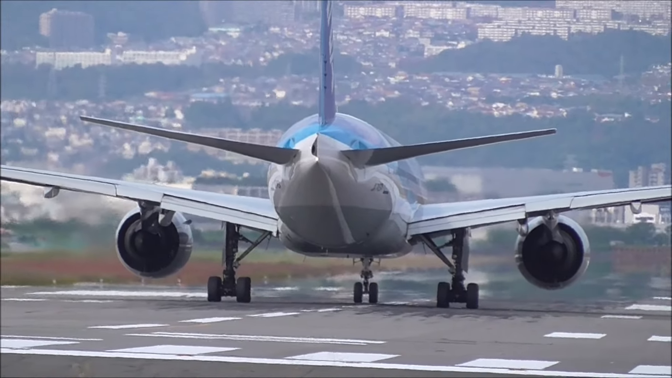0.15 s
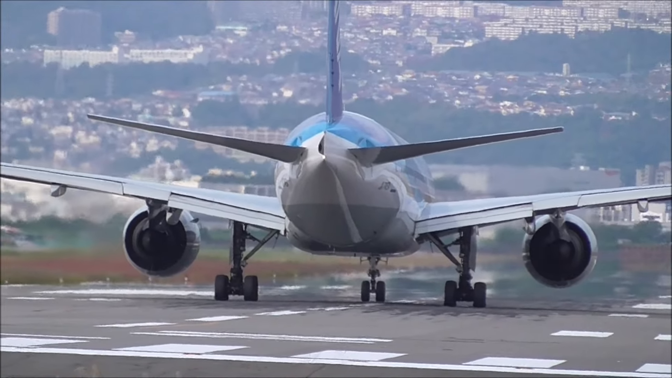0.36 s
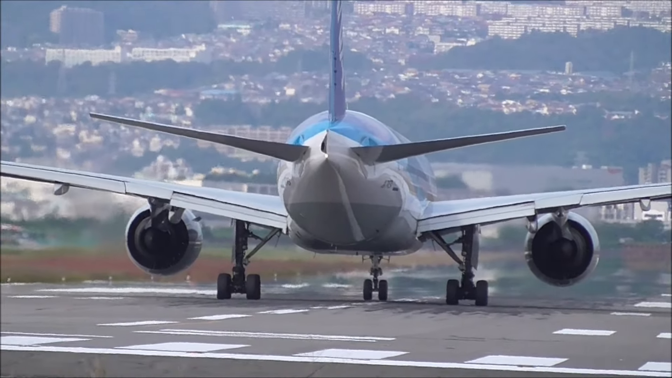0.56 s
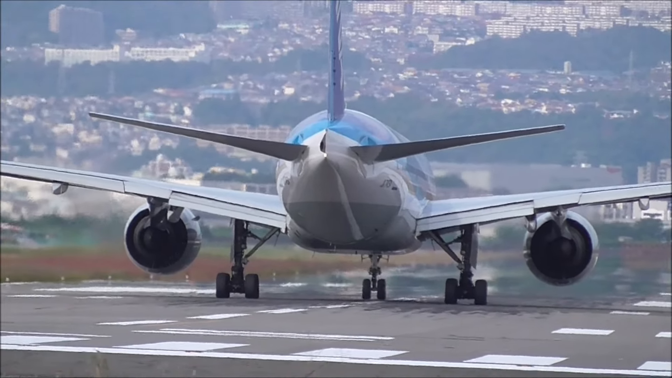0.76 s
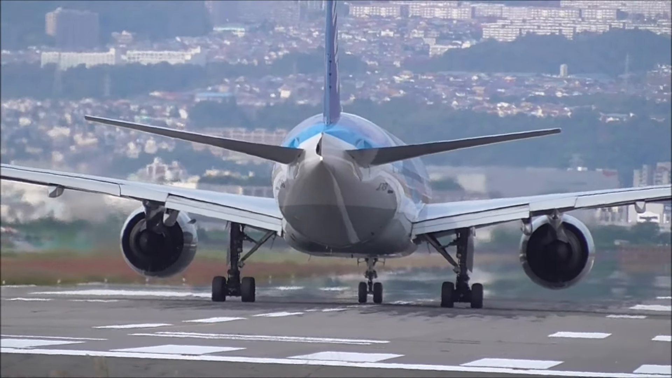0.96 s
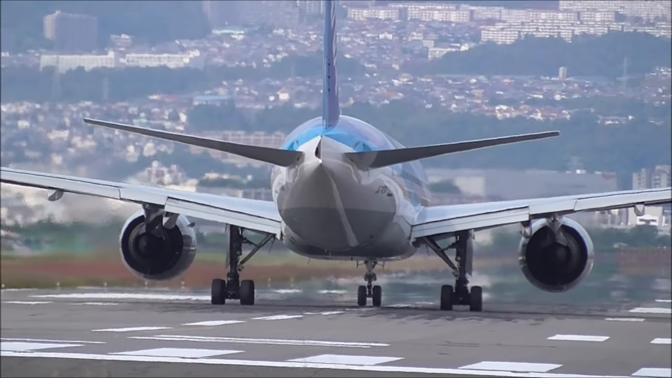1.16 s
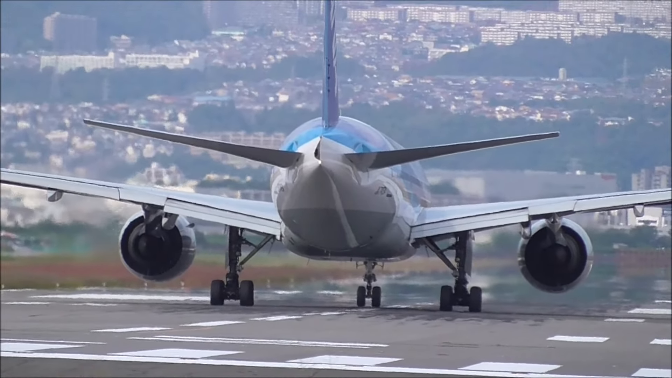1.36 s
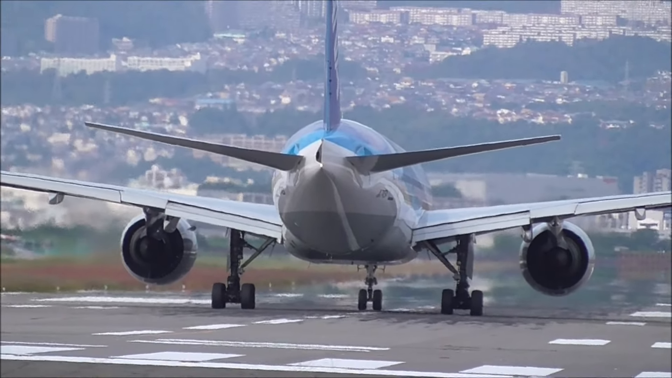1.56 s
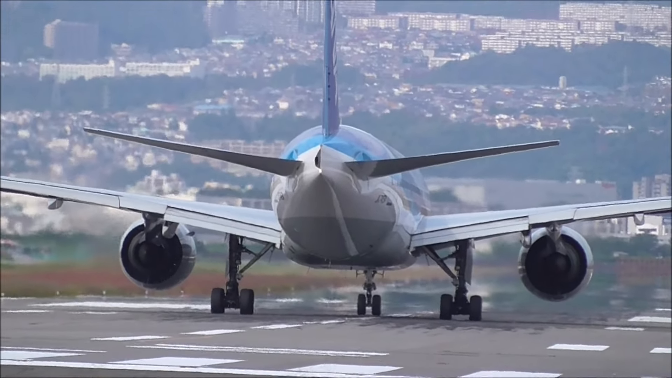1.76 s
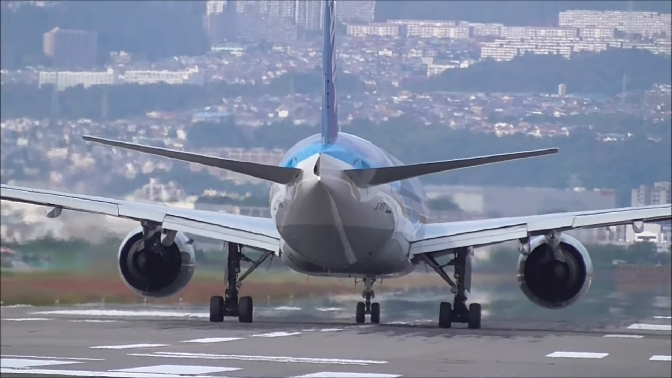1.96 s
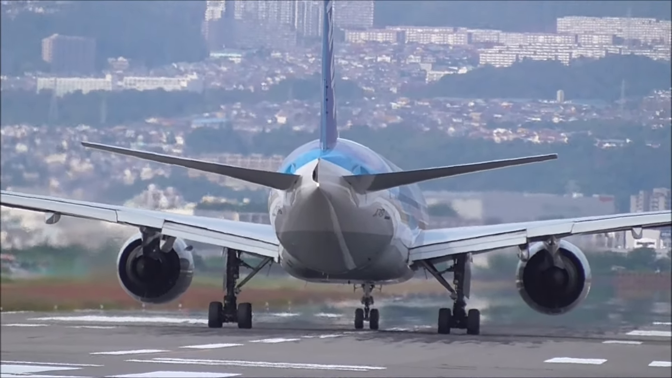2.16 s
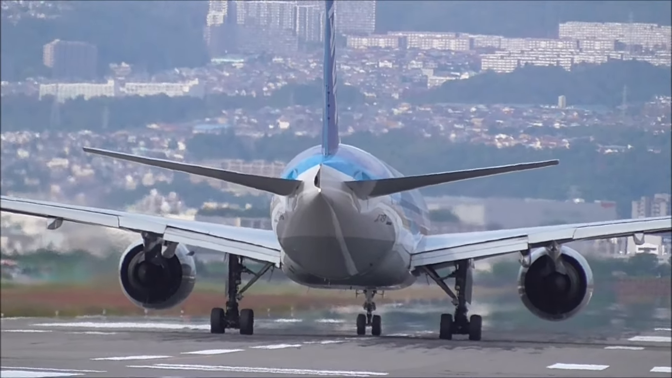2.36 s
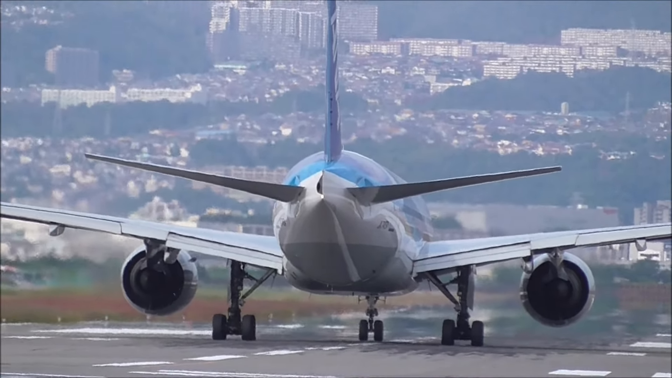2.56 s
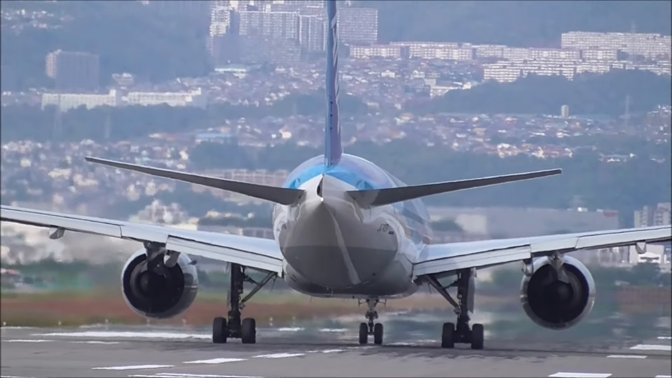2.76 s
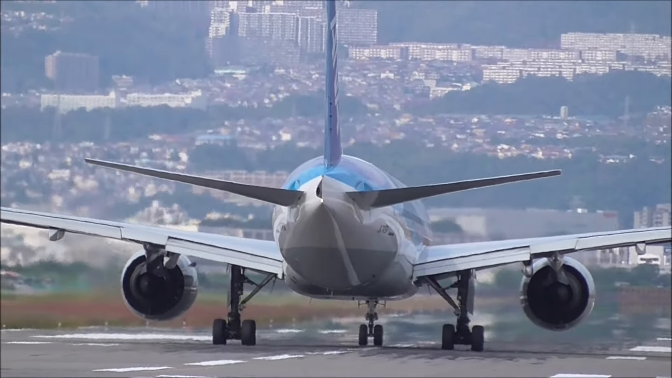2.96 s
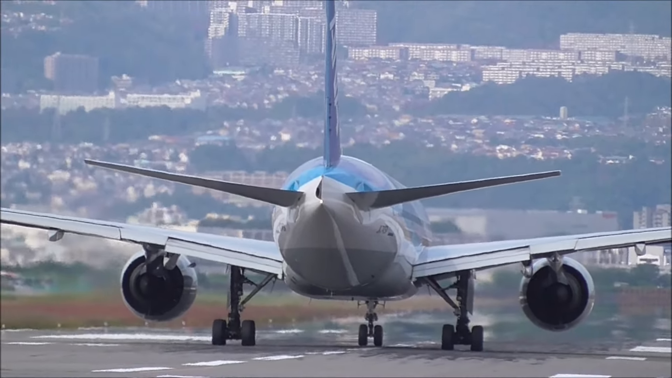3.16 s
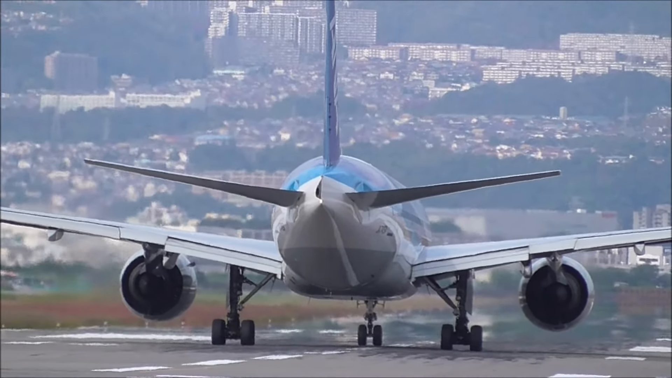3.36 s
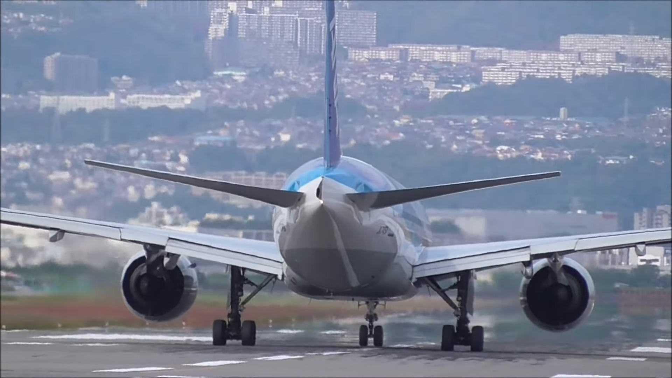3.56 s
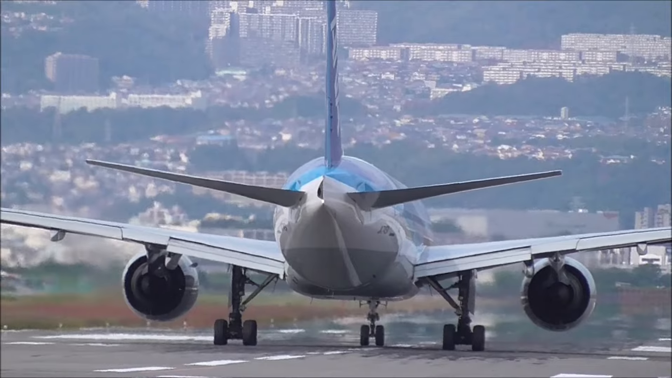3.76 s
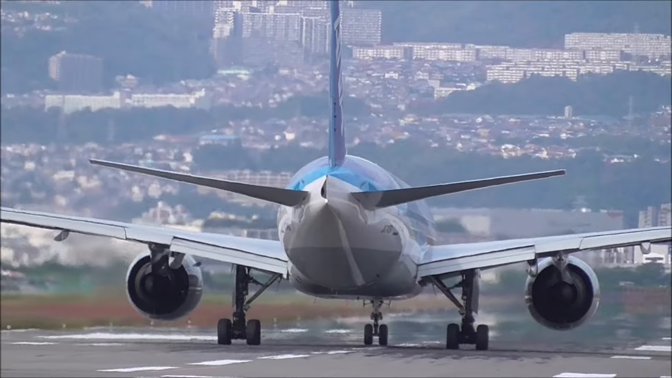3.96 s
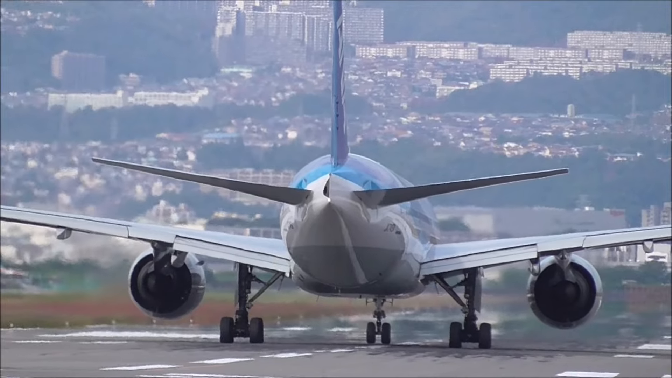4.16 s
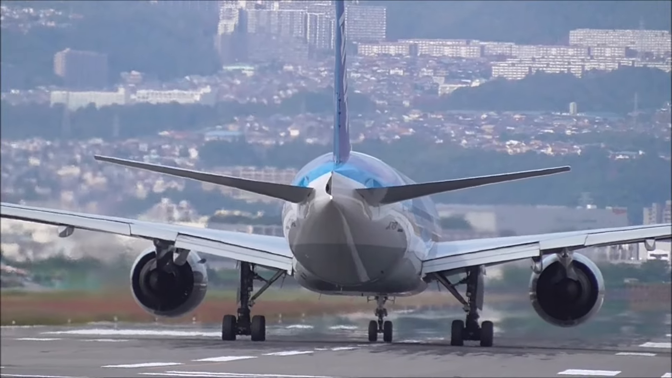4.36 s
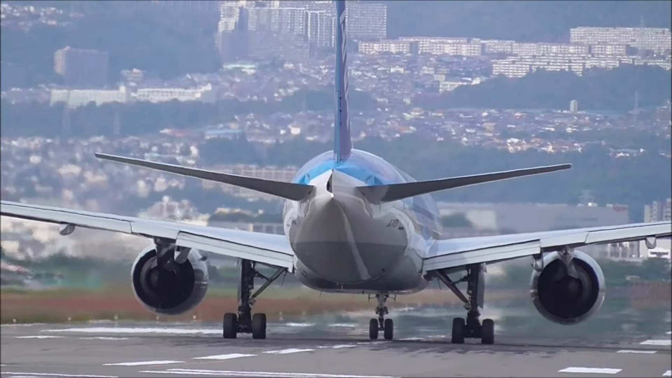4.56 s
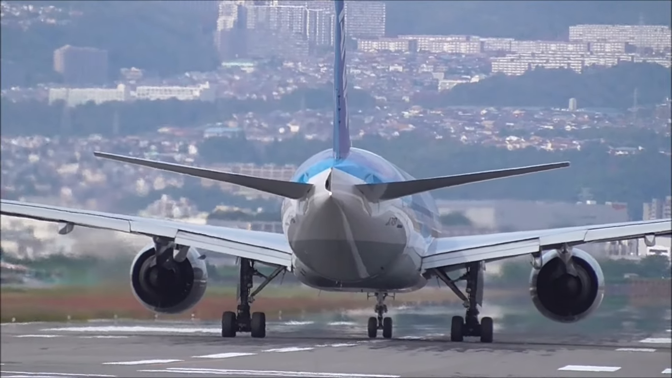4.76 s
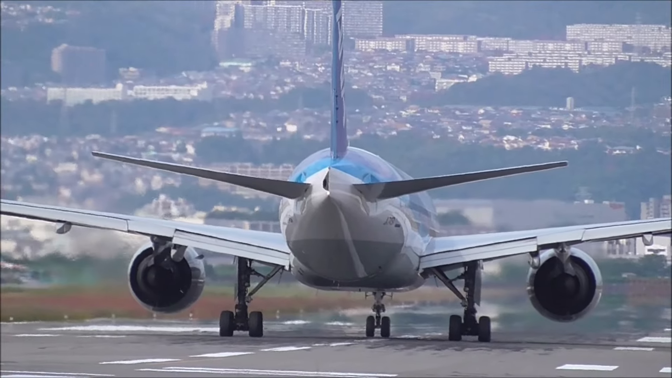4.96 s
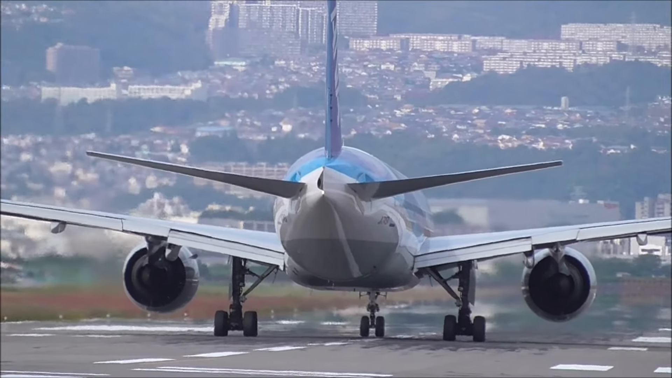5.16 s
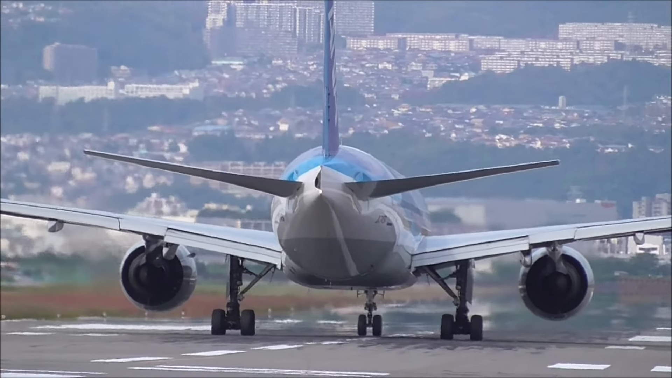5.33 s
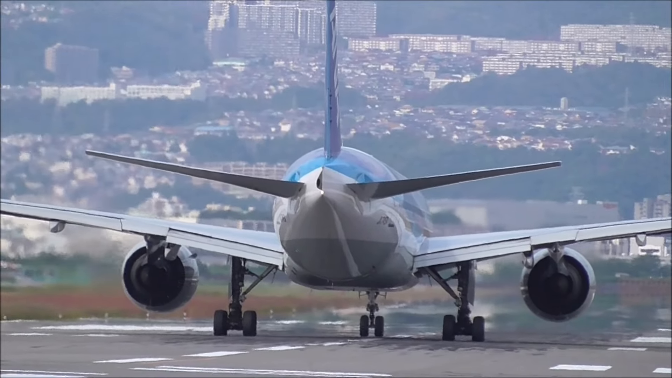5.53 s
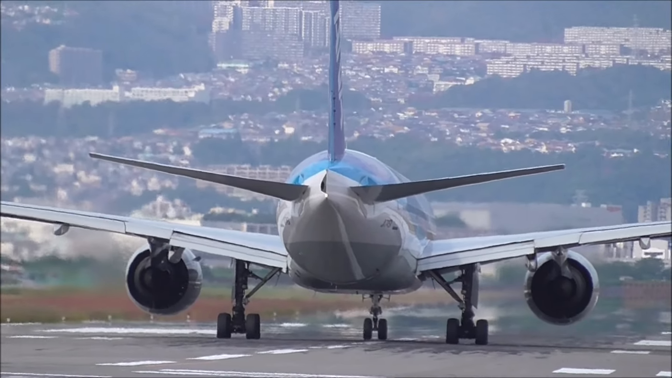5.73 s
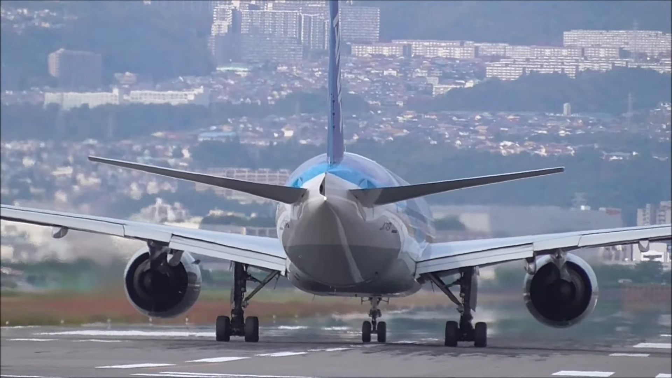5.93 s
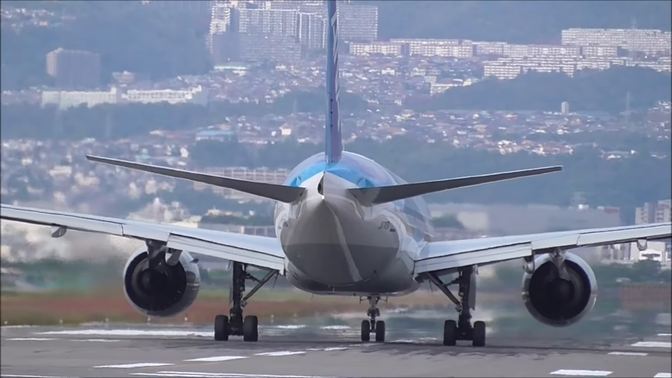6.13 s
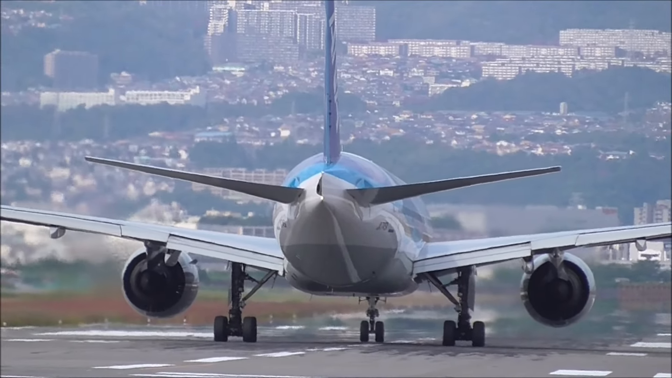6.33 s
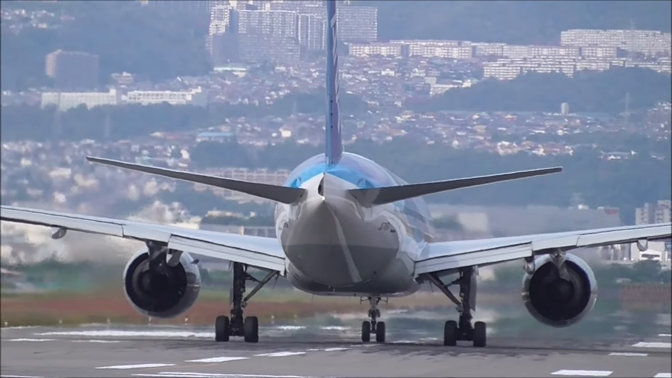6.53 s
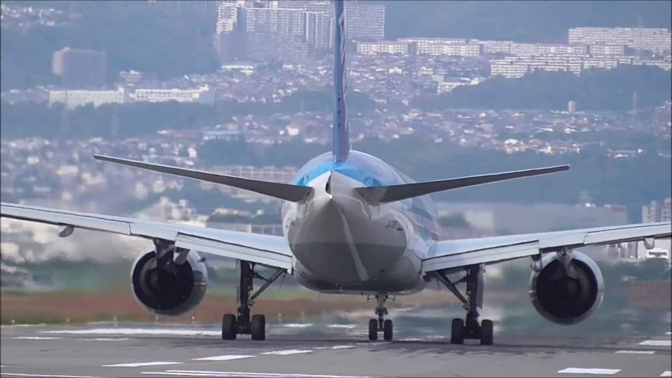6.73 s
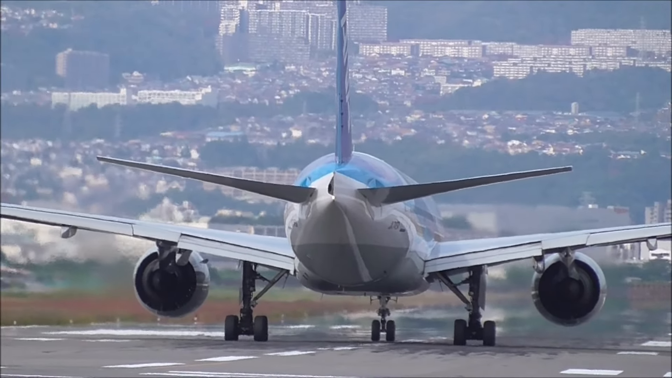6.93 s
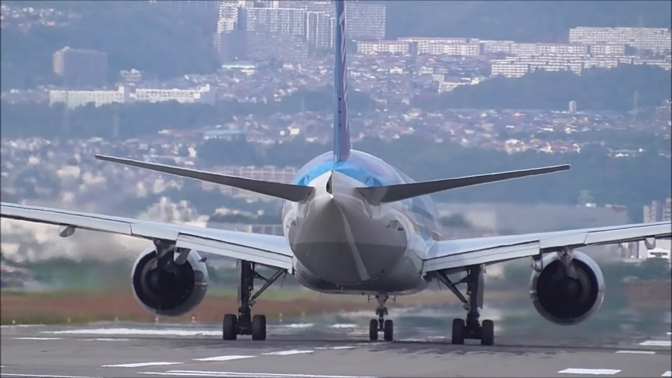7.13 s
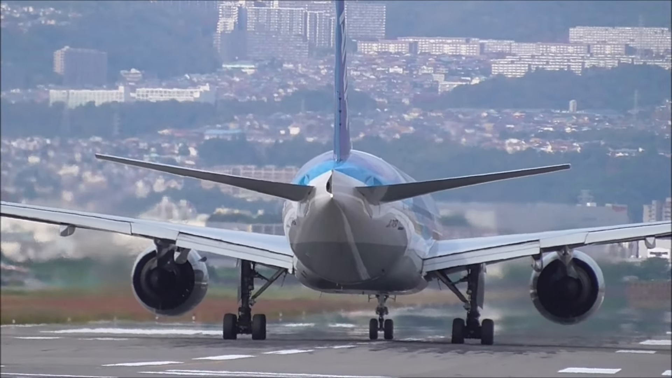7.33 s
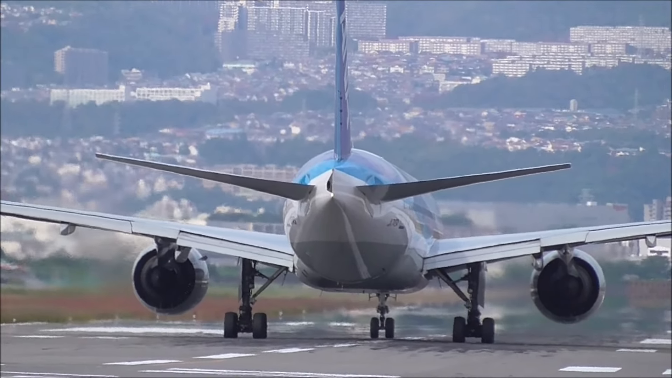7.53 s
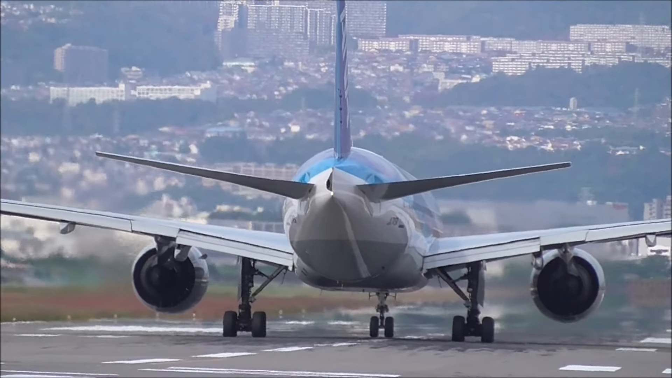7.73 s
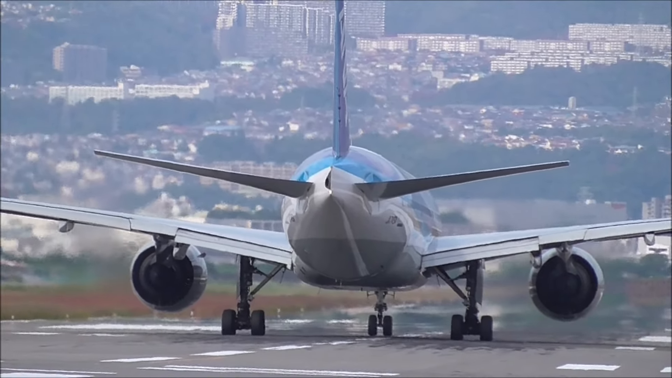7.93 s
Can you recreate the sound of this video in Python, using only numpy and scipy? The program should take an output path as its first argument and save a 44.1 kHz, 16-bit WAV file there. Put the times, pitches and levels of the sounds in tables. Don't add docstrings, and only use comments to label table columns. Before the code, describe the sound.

A jet airliner far down the runway holds a soft, windy exhaust roar over deep airfield bass, with two close low tones swelling and fading. Left-sided gusts flutter and thump at the small camera microphone, strongest after the middle, with faint body ticks. Then the throttles rise: the rumble and midrange roar grow, and hollow howls flare unevenly, one engine's tone dropping to a lower pitch, still loud at the end.

```python
import sys
import numpy as np
from scipy import signal
from scipy.fft import rfft, irfft, next_fast_len
from scipy.io import wavfile
from scipy.ndimage import uniform_filter1d, map_coordinates

SR = 44100
rng = np.random.default_rng(int(sys.argv[2]) if len(sys.argv) > 2 else 0)


def invert_db(x):
    u = np.asarray(x, float) / 20
    return 10 ** u


def store_wav(level_fs):
    pcm = np.round(np.clip(np.atleast_2d(level_fs), -1, 1) * 32767)
    wavfile.write(sys.argv[1], SR, pcm.T.astype(np.int16))


N = 352359

# [f/Hz, density/dB]
PREAMP_SPECTRUM = [(2000, -30), (5000, -12.5), (5700, -21.5), (6800, -12), (7200, -6.5), (8300, -1),
                   (9400, 3.5), (10300, 4.5), (11000, -2), (12400, 0), (13000, 3), (14200, -20.5),
                   (15500, -15.5)]
# [t/s, level/dB peak, bright snap level/dB]
CAMERA_TICKS = [
    (4.8654, -45, -10),
    (4.8678, -49, -8),
    (5.855, -46, -17),
    (5.859, -46, -16),
    (5.8757, -32.5, -25),
    (5.8805, -44, -16),
    (5.887, -55, -8),
]
# [f/Hz, density/dB]
FIELD_SPECTRUM = [(15, -45), (25, -13), (40, -8), (60, 1), (110, 1), (160, 1.5), (300, -42)]
# [t/s, held/s, level/dB, extra brightness/dB]
LEFT_GUSTS = [(.1, .02, -51, -29), (.42, 0.11, -38.5, 0.5), (.92, .1, -44, 1), (1.3, 0.15, -44, -13),
              (1.601, 0.024, -42.5, -7), (1.8, 0.094, -46, -1), (2.1, 0.25, -44.5, -12),
              (2.95, .05, -59, -6), (3.5, 0.14, -37.5, -6), (3.8, .1, -45.5, -5), (4.0, 0.26, -36.5, -9),
              (4.42, 0.2, -40, -3), (4.72, .1, -37.5, -8), (5.09, .05, -40, -12), (5.26, .08, -36, 5.5),
              (5.48, 0.31, -35, 0), (5.95, .15, -48, 1), (6.5, .02, -42, -5), (6.8, 0.036, -40.5, 8),
              (7.0, 0.15, -37, 4), (7.27, .35, -38.5, 6), (7.801, 0.017, -48, -3.5)]
# [t/s, held/s, level/dB]
RIGHT_GUSTS = [
    (.5, .02, -49),
    (1.7, .1, -44),
    (2.25, .1, -64.5),
    (4.2, 0.056, -40.5),
    (5, 0.98, -53),
    (6.7, .4, -54),
    (7.5, .1, -41.5),
]
# [f/Hz, density/dB]
BUFFET_SPECTRUM = [(15, -53), (25, -28.5), (60, -7), (113, 2.5), (200, -2), (300, -17.5), (500, -28),
                   (1200, -70)]
# [f/Hz, density/dB]
FLAP_SPECTRUM = [(100, -31), (220, -0.5), (320, -3), (480, -13), (700, -29), (1200, -36.5), (2600, -97)]
# [t/s, level/dB peak, f/Hz]
EDDIES = [(0.537, -22.8, 255.0), (4.869, -21.3, 205.0), (5.267, -14.4, 312.0), (5.284, -22.5, 301.0),
          (5.295, -10.8, 276.0), (5.307, -14.8, 242.0), (5.329, -18.8, 285.0), (5.356, -22.6, 168.0),
          (5.581, -19.6, 220.0), (5.616, -21.4, 235.0), (5.639, -15.6, 266.0), (5.662, -20.9, 237.0),
          (5.706, -22.6, 232.0), (5.716, -17.1, 284.0), (5.733, -23.3, 205.0), (5.757, -21.1, 237.0),
          (5.773, -16.2, 215.0), (5.803, -20.4, 251.0), (6.784, -20.6, 163.0), (6.796, -20.3, 170.0),
          (6.823, -20.6, 219.0), (7.158, -22.7, 292.0), (7.168, -22.5, 258.0), (7.331, -21.8, 188.0),
          (7.368, -22.1, 244.0), (7.438, -21.5, 287.0), (7.469, -22.0, 285.0), (7.53, -22.4, 264.0),
          (7.558, -23.5, 261.0), (7.6, -22.0, 219.0)]
# [t/s, opening above idle/0-1]
THROTTLE_OPENING = [(0, 0), (.4, 0), (3.6, 0.01), (4.3, 0.14), (4.8, 0.22), (5.2, 0.15), (6.0, 0.24),
                    (6.8, 0.6), (7.05, 0.66), (7.3, 0.78), (7.6, .88), (8, 0.96)]
# [t/s, f/Hz, level/dB]
SHAFT_TONE = [
    (0, 112.3, -53),
    (2, 113, -50.5),
    (3.5, 113, -53.5),
    (5.5, 113.9, -48),
    (7, 114.6, -48),
    (8, 112.4, -55.5),
]
# [t/s, held/s, level/dB]
FIRST_LOW_IDLE_SWELLS = [
    (.5, 0.9, -53),
    (1.75, 0.27, -56),
    (2.5, .5, -47.5),
    (3.7, .05, -54),
    (4.5, 0.42, -60),
]
FIRST_LOW_POWER_SWELLS = [
    (6.1, .15, -46),
    (6.28, .52, -39),
    (6.855, .11, -31),
    (7.07, .03, -45),
    (7.265, .16, -27),
    (7.44, .1, -30),
    (7.7, .13, -34),
    (7.86, .2, -32.5),
]
FIRST_OCTAVE_IDLE_SWELLS = [
    (0, 0.061, -44),
    (.65, .7, -47.5),
    (1.7, 0.21, -53),
    (2.6, 0.19, -50.5),
    (3.25, 0.08, -44.5),
    (3.85, 0.14, -45),
    (4.5, 0.35, -48),
]
FIRST_OCTAVE_POWER_SWELLS = [
    (6.3, 0.11, -42.5),
    (6.7, .03, -38.5),
    (6.8, 0.13, -40.5),
    (7.02, 0.13, -35.5),
    (7.35, 0.063, -36),
    (7.55, 0.21, -36.5),
    (7.72, .02, -36),
    (7.88, .2, -37.5),
]
SECOND_LOW_SWELLS = [
    (1.7, .3, -52),
    (3.7, .1, -44.5),
    (4.45, .95, -45),
    (4.0, .2, -52),
    (6.3, .3, -45.5),
]
SECOND_OCTAVE_SWELLS = [
    (1.75, .02, -42),
    (3.0, 0.086, -44.5),
    (4.4, .1, -54),
    (6.0, 0.59, -44),
    (7.0, .1, -52),
]
RELIT_LOW_SWELLS = [
    (7.55, .03, -37),
    (7.61, .08, -30.5),
    (7.855, .2, -30.5),
]
RELIT_OCTAVE_SWELLS = [
    (7.65, .1, -32),
    (7.78, .04, -36.5),
    (7.85, .04, -34.5),
    (7.92, .1, -36),
]
# [f/Hz, density/dB]
RUMBLE_SPECTRUM = [(40, -38), (90, -9.5), (140, -4.5), (200, 1.5), (300, -4.5), (420, -9.5), (800, -69)]
BODY_SPECTRUM = [(150, -47.5), (300, -10.5), (400, -7.5), (540, 0), (650, 2), (750, -5.5), (880, -13),
                 (1100, -36.5), (2000, -91.5)]
HISS_SPECTRUM = [(500, -42), (950, -5), (1430, 2), (1680, -5.5), (2030, -1), (2250, -5.5), (2550, -12),
                 (3220, -6), (4000, -11.5), (4800, -18), (5600, -32.5), (6300, -58.5), (9000, -89.5)]
# [f/Hz, correlation/0-1]
PORT_LIKENESS = [(60, 1), (300, 1), (690, 0.97), (1280, 0.91), (2350, 1), (3300, 1), (4330, 0.15)]
# [f/Hz, left minus right/dB]
PORT_TILT = [(100, 0.5), (250, 1), (400, -3), (650, -2), (1040, -2), (1670, -2.5), (2690, 1), (4330, 1.5)]
# [f/Hz, left lead/rad]
PORT_LEAD = [(100, 0.2), (300, -0.15), (570, -0.22), (650, 0.099), (900, -0.44), (1290, -0.47),
             (2580, 0.58), (3790, 0.0084), (4300, 1)]


def unit(x):
    return x / np.sqrt(np.mean(x ** 2) + 1e-20)


def along(points, hz):
    f, v = np.transpose(points)
    return np.interp(np.log(hz + 1), np.log(f + 1), v)


def curves(rows):
    s, *cols = np.transpose(rows)
    return [np.interp(np.arange(N) / SR, s, c) for c in cols]


def wobble(rate):
    knots = rng.standard_normal(int(N * rate / SR) + 4)
    return map_coordinates(knots, [np.arange(N) * rate / SR])


def filtered(x, response):
    m = next_fast_len(N + 8192)
    return irfft(rfft(x, m) * response(np.fft.rfftfreq(m, 1 / SR)), m)[..., :N]


def rush(spectrum, alike, patchy_db):
    z = signal.stft(rng.standard_normal((2, N)), nperseg=512)[2]
    patches = uniform_filter1d(rng.standard_normal(z.shape[1:]), size=5, axis=0)
    patches = uniform_filter1d(patches, size=12, axis=1)
    pair = signal.istft(z * invert_db(patchy_db * unit(patches)), nperseg=512)[1][:, :N]

    def mid_side(hz):
        turn = np.arccos(np.clip(along(alike, hz), -1, 1)) / 2
        return invert_db(along(spectrum, hz)) * [np.cos(turn), np.sin(turn)]

    mid, side = filtered(pair, mid_side)
    return unit(np.array([mid + side, mid - side]))


def swells(rows, rest_db, rise, fall):
    s = np.arange(0, N + 64, 64) / SR
    start, held, peak_db = np.transpose(rows)[:, :, None]
    before = np.maximum(start - s, 0)
    after = np.maximum(s - start - held, 0)
    each_db = peak_db - rise * before - fall * after
    total_db = 10 * np.log10(invert_db(rest_db) ** 2 + np.sum(invert_db(each_db) ** 2, axis=0))
    return np.interp(np.arange(N) / SR, s, total_db)


def preamp_hiss():
    likeness = [(5000, .35), (9000, 0.39), (15000, .5)]
    return invert_db([[-74], [-73]]) * rush(PREAMP_SPECTRUM, likeness, patchy_db=1.6)


def ticks():
    out, t = np.zeros(N + SR), np.arange(600) / SR
    grit = rng.standard_normal((len(CAMERA_TICKS), 2, len(t)))
    low = signal.butter(3, [2900, 4700], "bandpass", fs=SR, output="sos")
    high = signal.butter(3, [7000, 9500], "bandpass", fs=SR, output="sos")
    swell = (1 - np.exp(-t / .0007)) ** 2 * invert_db(-60 * t / .0105)
    for (s, db, bright_db), (dull, sharp) in zip(CAMERA_TICKS, grit):
        ring = np.sin(2 * np.pi * 3520 * t) + .3 * np.sin(2 * np.pi * 4150 * t)
        ring = ring + .25 * unit(signal.sosfilt(low, dull))
        snap = 0.36 * np.sin(2 * np.pi * 8000 * t) + 0.52 * unit(signal.sosfilt(high, sharp))
        out[round(s * SR):][:len(t)] += invert_db(db + 8.3) * swell * (ring + invert_db(bright_db) * snap)
    return out[:N] * invert_db([[-1.1], [1.1]])


def wind():
    calm_db, gust_rate = -76, 94
    lee_calm_db, lee_rate = -51.5, 34
    deep_rows = [(s, held, db) for s, held, db, _ in LEFT_GUSTS]
    flap_rows = [(s, held, db + bright_db) for s, held, db, bright_db in LEFT_GUSTS]
    level_db = swells(deep_rows, calm_db, gust_rate, gust_rate)
    flap_db = swells(flap_rows, calm_db - 4.5, gust_rate, gust_rate)
    lee_db = swells(RIGHT_GUSTS, lee_calm_db, lee_rate, lee_rate)
    slow = np.array([wobble(22), wobble(22)])
    fast = np.array([wobble(60), wobble(60)])
    lumps = invert_db(2.8 * slow + 2.5 * fast)
    buffet = unit(lumps * rush(BUFFET_SPECTRUM, [(30, 0.00064)], patchy_db=2.0))
    flap = unit(lumps * rush(FLAP_SPECTRUM, [(30, 0.0019)], patchy_db=2.0))
    left = invert_db(level_db) * buffet[0] + invert_db(flap_db - 2.5) * flap[0]
    right = invert_db(lee_db) * (buffet[1] + invert_db(-13.5) * flap[1])
    return np.array([left, right])


def thumps():
    bed = .035
    out, t = np.zeros(N + SR), (np.arange(800) - 400) / SR
    twist = rng.uniform(-.9, .9, len(EDDIES))
    for (s, db, hz), turn in zip(EDDIES, twist):
        bump = np.exp(-(1.45 * hz * t) ** 2) * np.cos(2 * np.pi * hz * t + turn)
        out[round(s * SR) - 400:][:800] += (invert_db(db) - bed) * bump
    return out[:N] * np.array([[1], [0]])


def airfield_bass():
    return invert_db(-48.5 + 0.78 * wobble(2.48)) * rush(FIELD_SPECTRUM, PORT_LIKENESS, patchy_db=1.9)


def drone():
    hz, level_db = curves(SHAFT_TONE)
    phase = 2 * np.pi * np.cumsum(hz) / SR + .5 * wobble(5.5)
    return np.sqrt(2) * invert_db(level_db + 1.4 * wobble(6.4)) * np.sin(phase)


def howl(hz, low_db, octave_db, smear, flutter_db):
    phase = 2 * np.pi * np.cumsum(hz) / SR
    unsteady = np.interp(low_db, [-50, -30], [3.5, 1.2])
    low_gain = invert_db(low_db - 0.4 + unsteady * flutter_db * wobble(10))
    low = low_gain * np.sin(phase + unsteady * smear * wobble(9))
    octave_gain = invert_db(octave_db + flutter_db * wobble(12))
    octave = octave_gain * np.cos(2 * phase + smear * wobble(13))
    return np.sqrt(2) * (low + octave)


def lazy(rows, rest_db):
    return swells(rows, rest_db, 26, 26)


def quick(rows):
    return swells(rows, -90, 140, 165)


def first_engine():
    opening, = curves(THROTTLE_OPENING)
    low_db = np.maximum(lazy(FIRST_LOW_IDLE_SWELLS, -54), quick(FIRST_LOW_POWER_SWELLS))
    idle_octave_db = lazy(FIRST_OCTAVE_IDLE_SWELLS, -51.5) + 6 * opening ** 2
    octave_db = np.maximum(idle_octave_db, quick(FIRST_OCTAVE_POWER_SWELLS))
    hz = 321.1 - 3.2 * opening ** 2
    return howl(hz, low_db, octave_db, smear=.1, flutter_db=.7)


def second_engine():
    s = np.arange(N) / SR
    dropout_s, lock_s = 7.1, 7.64
    low_db, octave_db = lazy(SECOND_LOW_SWELLS, -59), lazy(SECOND_OCTAVE_SWELLS, -65.5)
    upper = howl(327.3 + .5 * wobble(4), low_db, octave_db, smear=.2, flutter_db=.8)
    upper = upper * np.clip((dropout_s - s) * 8 - 1, 0, 1)
    hz = np.where(s < lock_s, 281.7, 285.2 + 5 * (s - lock_s))
    lower = howl(hz, quick(RELIT_LOW_SWELLS), quick(RELIT_OCTAVE_SWELLS), smear=.1, flutter_db=.5)
    return upper + lower


def roar():
    opening, = curves(THROTTLE_OPENING)
    rumble_db = -46 + 10.5 * opening ** 0.82
    body_db = -42 + 10.5 * opening ** 2.37
    hiss_db = -51.42 + 3.5 * opening ** 0.71
    path = wobble(2.746)
    rumble = invert_db(rumble_db + .5 * path) * rush(RUMBLE_SPECTRUM, PORT_LIKENESS, patchy_db=0.5)
    body = invert_db(body_db + .5 * path) * rush(BODY_SPECTRUM, PORT_LIKENESS, patchy_db=0.9)
    hiss_gain = invert_db(hiss_db + 0.69 * path + 0.16 * wobble(8.3))
    hiss = hiss_gain * rush(HISS_SPECTRUM, PORT_LIKENESS, patchy_db=0.69)
    return rumble + body + hiss


def aircraft():
    tones = drone() + first_engine() + second_engine()

    def ports(hz):
        left_over_right = invert_db(along(PORT_TILT, hz)) * np.exp(1j * along(PORT_LEAD, hz))
        return left_over_right ** np.array([[.5], [-.5]])

    return filtered(airfield_bass() + tones + roar(), ports)


def scene():
    return ticks() + wind() + thumps() + aircraft()


def band_limit(x):
    return signal.sosfilt(signal.butter(12, 15720, fs=SR, output="sos"), x)


def record(dry):
    mix = dry + preamp_hiss()
    return band_limit(mix)


dry = scene()
out = record(dry)
store_wav(out)
```